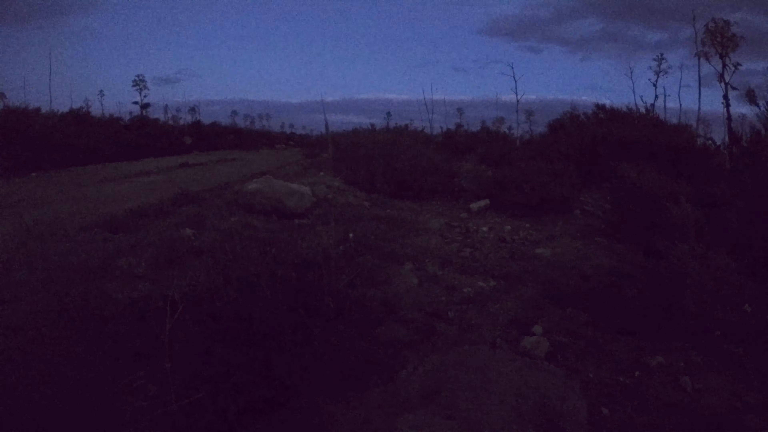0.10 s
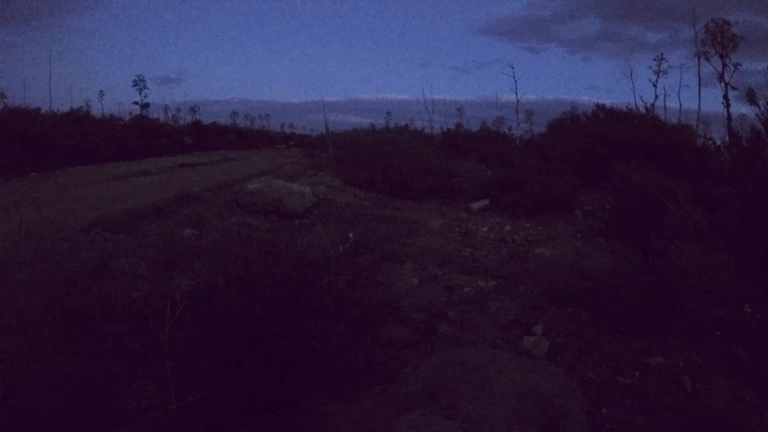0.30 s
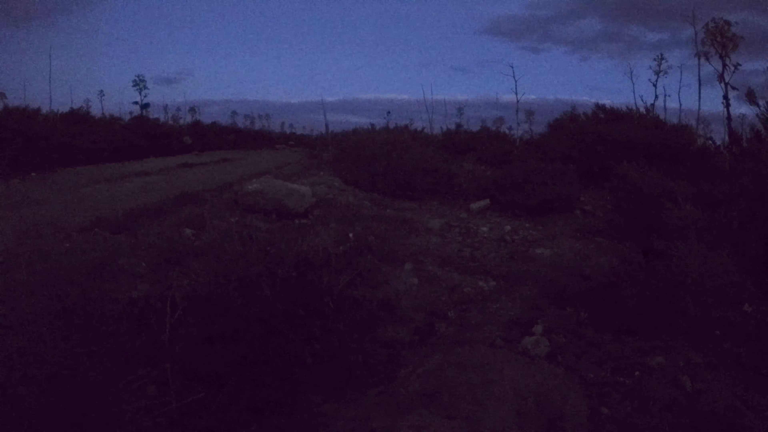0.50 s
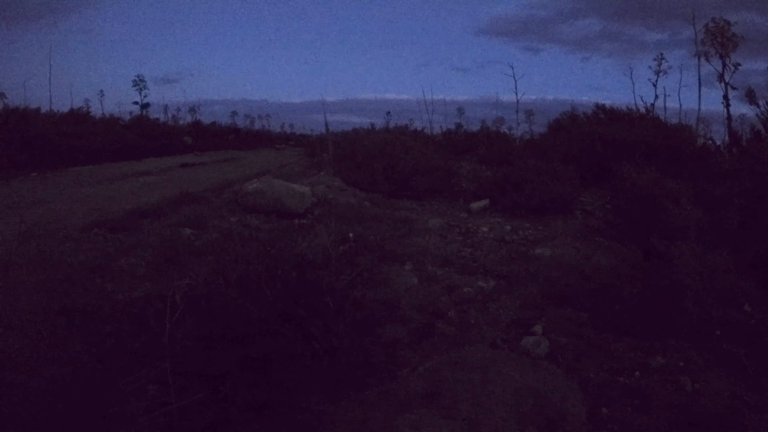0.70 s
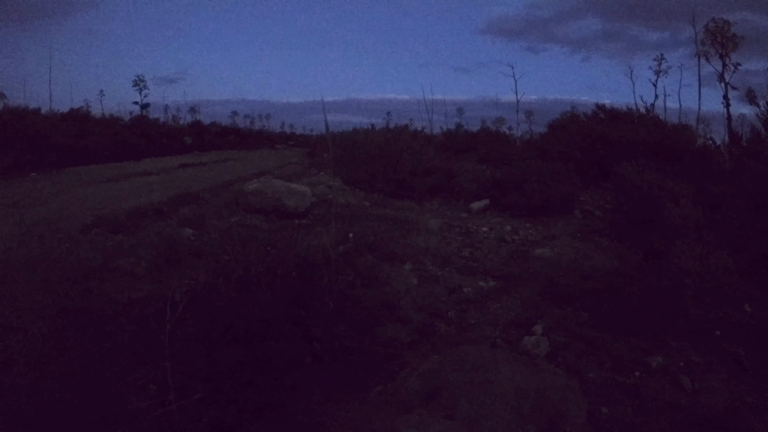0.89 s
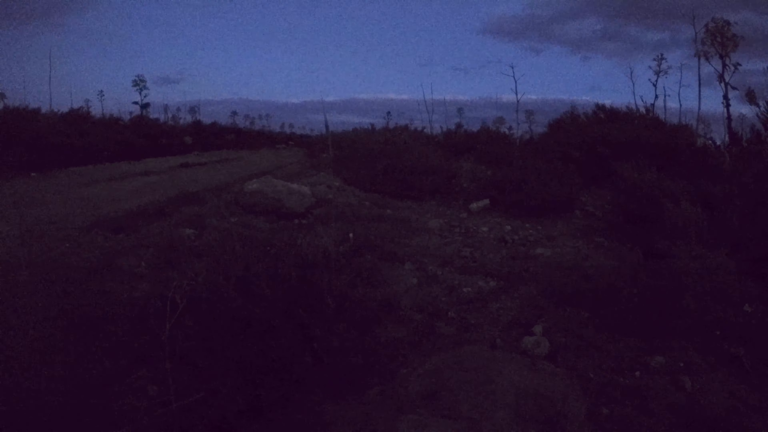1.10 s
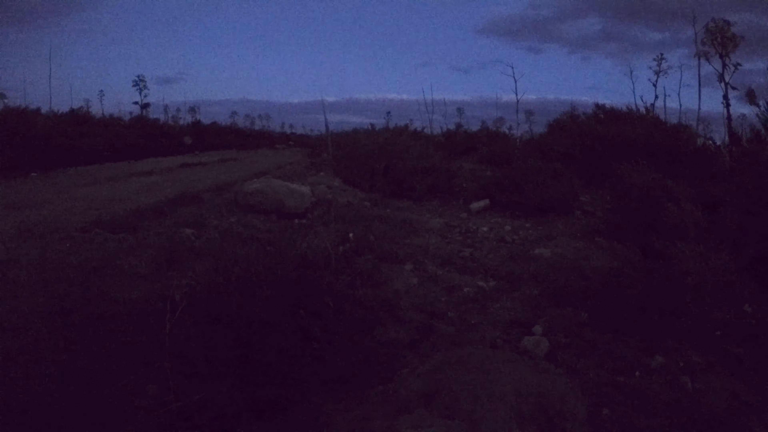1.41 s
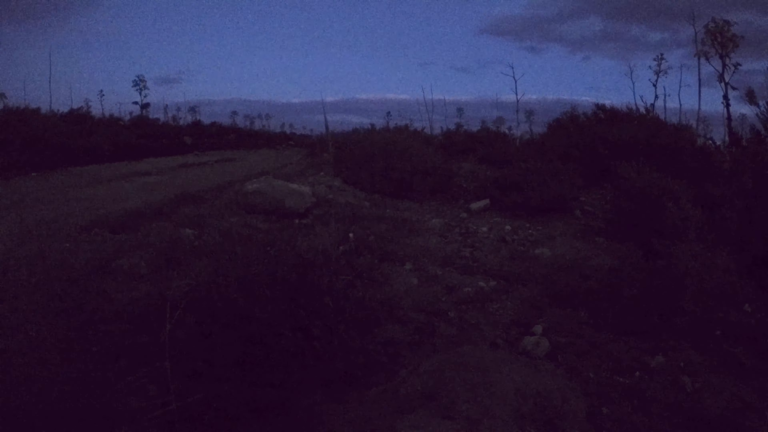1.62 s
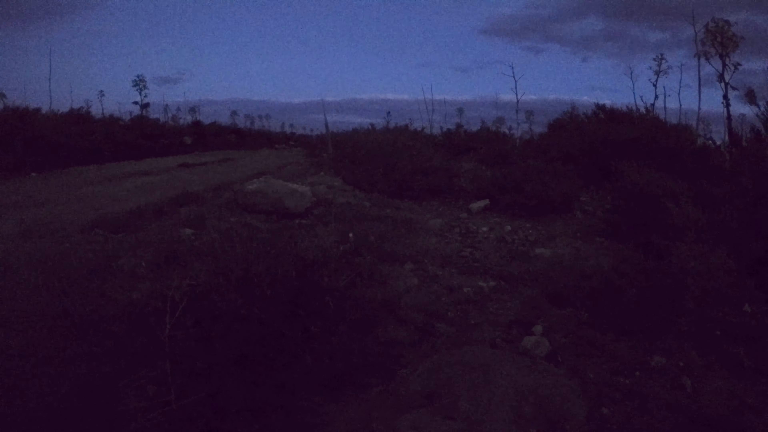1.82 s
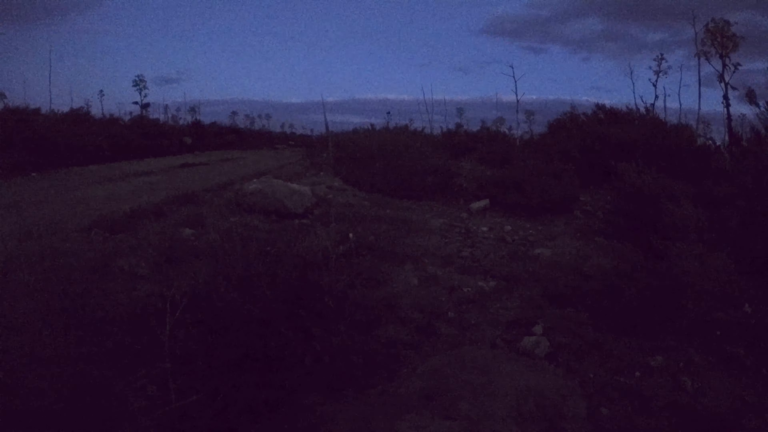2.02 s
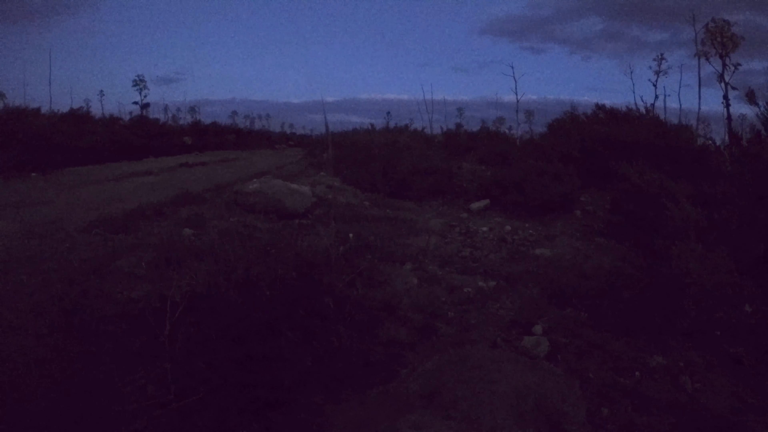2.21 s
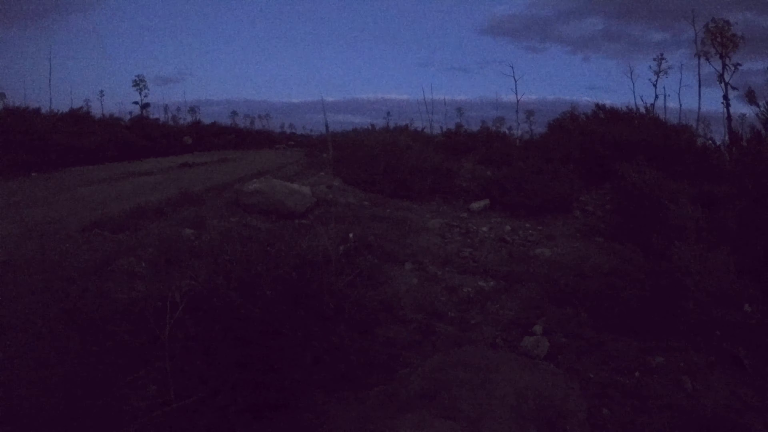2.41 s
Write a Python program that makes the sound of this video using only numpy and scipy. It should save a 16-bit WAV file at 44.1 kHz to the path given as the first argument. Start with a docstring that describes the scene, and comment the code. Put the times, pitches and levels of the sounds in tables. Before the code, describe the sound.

Handling knocks and rubbing on a camera casing, hollow plastic thuds over faint hiss outdoors

```python
"""Knocks and rubbing excite the damped modes of a handled camera's casing, which shakes its two
microphones nearly in opposition. Below, the light mount booms through three low modes and sways slowly
as narrow-band noise, over a rumble. In open scrubland at dusk a far bird chirps faintly as gliding sines
over the microphones' coloured hiss. A gain control ducks after the loudest blows."""
import sys
import numpy as np
from scipy import signal
from scipy.fft import rfft, irfft
from scipy.io import wavfile
from scipy.ndimage import uniform_filter1d

SR = 44100
rng = np.random.default_rng(int(sys.argv[2]) if len(sys.argv) > 2 else 0)


def wav_record(signal):
    """Record a signal, one row per channel, as 16-bit PCM in the file named by sys.argv[1]."""
    frames = np.transpose(np.atleast_2d(signal))
    bounded = np.clip(frames, -1, 1)
    # unit amplitude maps onto the largest positive 16-bit level
    quanta = np.round(bounded * 32767).astype(np.int16)
    wavfile.write(sys.argv[1], SR, quanta)


N = 112455

# Hiss spectrum. Each row: frequency in Hz, relative density in dB.
HISS_COLOUR = [(600, -2), (1500, 0.5), (2500, -4), (4700, -7), (7000, -5), (9500, -6), (11000, -9.5),
               (12200, -13.5), (14000, -40)]
# Stereo balance of the hiss. Each row: frequency in Hz, left minus right in dB.
HISS_PAN = [(300, -5), (2000, 2.5), (4000, -2.5), (7500, -5), (10000, -8), (13600, 3)]
HISS_TREBLE_DB, HISS_SINK_DB_PER_S = -59, 2.08  # starting level of the part above 2500 Hz; its fall

# Far chirps. Each row: start in seconds, length in seconds, first frequency in Hz, last frequency in Hz,
# level in dB before flicker and panning.
CHIRPS = [(0.584, 0.064, 3080, 3400, -69.5), (1.54, .05, 3370, 3080, -68), (1.737, 0.0393, 3360, 3100, -64)]
FLICKER_DEPTH, FLICKER_S = 0.7, 0.004  # rms share of the level; averaging time

# Rumble of air and hands. Each row: time in seconds, level in dB before panning.
RUMBLE = [(0.0, -43.5), (0.08, -42), (0.09, -42), (0.5, -39), (0.64, -45.5), (0.67, -46), (1.25, -45),
          (1.27, -41.5), (1.42, -47.5), (1.7, -44), (1.8, -45), (1.87, -39), (2.43, -48.5), (2.55, -45)]
# Rumble spectrum. Each row: frequency in Hz, relative level in dB.
RUMBLE_COLOUR = [(20, -11.5), (45, 4), (70, 3), (110, -8.5), (200, -10), (400, -20), (900, -37),
                 (3000, -73)]
RUMBLE_CORRELATION, RUMBLE_PAN_DB = 0.18, -4.5  # between left and right; left minus right

# Slow sway of the mount. Each row: time in seconds, level in dB before panning.
SWAY = [(0.0, -22), (0.11, -46.5), (0.21, -33.5), (0.37, -41.5), (0.6, -35), (0.63, -70), (0.68, -34),
        (0.73, -65), (0.81, -34), (1.43, -46.5), (1.45, -51), (1.5, -39.5), (1.71, -38), (1.76, -38),
        (2.01, -35.5), (2.11, -26.5), (2.22, -28), (2.55, -42)]
SWAY_HZ, SWAY_WIDTH_HZ, SWAY_PAN_DB = 26.59, 1.5, -3

# Knocks on the casing. Each row: start in seconds, casing level in dB before KNOCK_DB, hardness in dB per
# octave, rattle length in seconds, lift of dull modes in dB, lift of woody modes in dB, lift of top modes
# in dB, upper boom in dB before BOOM_DB, lower boom in dB before BOOM_DB.
KNOCKS = [(0.207, -27, -13, 0.003, 4, -3, -3, -42, -47),
          (0.218, -18, 5, 0.0069, 4, -5.5, -22, -29.5, -43.5),
          (0.228, -26.5, 1.5, 0.0017, -7, 12, -24, -28.5, -61),
          (0.263, -25.5, -6, 0.0021, 17, -12, -3, -59, -48),
          (0.328, -22, -15, 0.0026, 7, -22, -1, -48, -57),
          (0.376, -13, -1.5, 0.0031, 1, 0.5, -1.5, -37, -24.5),
          (0.383, -14.5, -2, 0.0077, -6, -13, -6, -24.5, -18),
          (0.409, -22, -29, 0.033, -8, 3, -7, -34.5, -49),
          (0.443, -30.5, 2, 0.036, 7.5, 13, 2, -34.5, -34.5),
          (0.488, -25.5, 7.5, 0.008, 18.5, 18, -20, -30.5, -37),
          (0.493, -27.5, 8, 0.0078, 14, 12.5, -24, -71, -28),
          (0.504, -34.5, 11, 0.0088, 13, 9.5, -22, -42, -22),
          (0.537, -32.5, 1, 0.011, 10, 11, -8, -43, -43), (0.559, -23, 8.5, 0.0084, 8, -7, -18, -31.5, -55),
          (0.563, -14.5, 4.5, 0.0047, -17, 3.5, -12, -26.5, -42),
          (0.679, -23.5, -8.5, 0.0044, -19, 2, 4, -33.5, -45),
          (0.69, -12.5, -5.5, 0.0015, -26.5, 6, -19, -49, -40),
          (0.693, -11, -18, 0.0052, -16, -10.5, -9, -36, -50),
          (0.717, -15, -9, 0.0086, 4.5, -9, 17, -18.5, -20.5),
          (0.734, -13.5, -13, 0.0029, -18.5, -6, -2, -38, -47),
          (0.798, -34.5, -4, 0.013, -7, 8.5, -7, -43.5, -37), (0.829, -28.5, -9, 0.025, 1, 2, -3, -52, -41),
          (0.854, -23.5, 0, 0.0036, -2, 8, -9, -26.5, -25),
          (0.868, -16.5, -3.5, 0.012, 8.5, 6, -8, -16.5, -23),
          (0.894, -33, -2, 0.0053, 0, 15.5, -1, -42, -36), (0.915, -33.5, 5.5, 0.024, 9, 10, -7, -50, -44),
          (0.995, -11, -1, 0.0067, 2, 3, -11.5, -21.5, -21), (1.011, -21.5, 1, 0.011, 12, 8, 4, -12.5, -34),
          (1.03, -10.5, 3, 0.0037, 10.5, -0.5, -7.5, -32, -15),
          (1.045, -10.5, -8.5, 0.0075, -6, 4, -5, -14.5, -21.5),
          (1.065, -14, -2, 0.012, -4.5, 1.5, 0, -24, -30),
          (1.08, -29.5, 7.5, 0.0057, -0.5, 14, -8, -25, -36.5),
          (1.117, -22, -15, 0.0054, 2, 10, -5.5, -49, -56),
          (1.128, -13.5, 0, 0.018, -1, -13, -12, -57, -51), (1.141, -14, 4, 0.0027, -3, 0, -9, -21, -33),
          (1.159, -14, 0, 0.0065, 6.5, 4, 4, -22.5, -33),
          (1.193, -11.5, -6.5, 0.0039, -2, 3.5, -6, -37, -42),
          (1.244, -18, -1, 0.026, 8, -6, -13, -46, -29.5),
          (1.265, -15.5, 1.5, 0.0037, -4.5, -15, 4.5, -21, -34),
          (1.271, -15.5, -6.5, 0.011, 12.5, 4.5, 7, -16, -12.5),
          (1.486, -34, -5.5, 0.004, 12.5, 7.5, -6, -35.5, -37),
          (1.541, -21, -1, 0.024, 9.5, 0, -11, -39.5, -33.5),
          (1.573, -24.5, 2.5, 0.0096, 9.5, 6.5, -2.5, -37.5, -28.5),
          (1.675, -16, -1.5, 0.011, 7.5, 2.5, -3, -22, -20),
          (1.736, -26, 2.5, 0.013, 6, -6, 0.5, -33.5, -36), (1.781, -30.5, -15, 0.018, 2, -7, 0, -39, -44),
          (1.805, -20.5, 3.5, 0.0076, 12, 4.5, -2, -28.5, -32.5),
          (1.824, -18, 1, 0.014, 11, 5, -3, -17, -19.5), (1.87, -19, -2.5, 0.0038, 1.5, -3, -6, -21, -32),
          (1.876, -10, -0.5, 0.012, 7, -12, -1, -37.5, -23),
          (1.892, -14.5, -31, 0.019, 5.5, 2, 9, -17, -18),
          (1.949, -9, -5, 0.0099, 6.5, 2, -10, -13.5, -20.5),
          (1.97, -6.5, -5.5, 0.011, 6.5, 1.5, 9.5, -7.5, -9.5),
          (2.004, -26.5, -25, 0.01, 5, -1, -5, -43, -46.5),
          (2.11, -23, 11, 0.0075, 15, 6, -12.5, -15.5, -16),
          (2.225, -36.5, -5, 0.0027, 13.5, 9, -4, -69, -88),
          (2.24, -27.5, -8.5, 0.007, -2, 2, -5.5, -54, -53),
          (2.335, -41.5, 5.5, 0.0053, -16, -5, -19, -87, -63)]
KNOCK_DB, FIRST_BLOW = 6, 0.41  # added to every knock; share of force in the first contact

# Fingers rubbing the casing. Each row: time in seconds, level in dB before RUB_DB or RUB_MOUNT_DB.
RUB = [(0.0, -58.5), (0.19, -46.5), (0.26, -41.5), (0.38, -40), (0.4, -38), (0.69, -52.5), (0.77, -43.5),
       (0.89, -36.5), (1.08, -38), (1.15, -33), (1.28, -42), (1.33, -40.5), (1.6, -44.5), (1.79, -40.5),
       (1.9, -38.5), (2.04, -45), (2.47, -50.5), (2.55, -45.5)]
RUB_GRAIN_DB, RUB_PER_S = 1.5, 4000  # spread of slip sizes; mean rate of slips
RUB_DB, RUB_MOUNT_DB = -18.5, -32  # added where rubbing drives the casing, the mount

# Mount modes. Each row: frequency in Hz, 60 dB decay time in seconds, left minus right in dB, phase lead
# of the left in radians, starting phase in radians, level over its boom column in dB.
MOUNT = [(179.53, 0.14, -6, 1.11, 0.19, 5.5), (213.2, 0.051, 11, 1.62, 0.028, 6),
         (149.8, 0.11, -16.5, 2.55, 1.28, 1.5)]
BOOM_RISE_S, BOOM_DB, MOUNT_SKIRT_HZ = 0.0038, 4, 39  # half a push; added to booms; build-up bandwidth

# Casing modes. Each row: frequency in Hz, level in dB, 60 dB decay time in seconds (ring() raises it to
# at least 0.005), left minus right in dB, phase lead of the left in radians.
CASING = [(317.2, -19.5, 0.021, -20, 0.4), (503.4, -8, 0.042, -7, 3.27), (612, -24, 0.05, -13.5, 6.6),
          (665.1, 0.4, 0.06, -7.5, 3.68), (814.7, -2.5, 0.048, -1.5, 3.46), (921, -7, 0.0088, -2, 8.28),
          (1148, -7.5, 0.051, -1.5, 3.295), (1203.5, -3.5, 0.027, 1.56, 2.725),
          (1367.4, -10, 0.019, 0.2, 8.1), (1700, -19.5, 0.012, 1.5, 2.9), (1944, -16, 0.016, -0.6, 2.22),
          (2350, -33, 0.014, -1, 2.1), (2660, -25, 0.0089, -1, 2.415), (3230, -28, 0.0041, 6.5, 1.6),
          (4110, -30.5, 0.0022, 0.5, 1.6), (5740, -41, 0.0044, -15.5, 0.55)]
# How much more rubbing drives each casing mode than a knock does. Each entry: lift in dB.
RUB_LIFT_DB = [-3, 0, 9, -9, -3.2, 1.5, 1, 4.5, 2.5, 3.5, -1, 9.5, 5.5, 5.5, 3.5, 3.5]
SOFTNESS = 0.64  # build-up bandwidth of a casing mode over its frequency
LAG_CYCLES = 1.093  # bending waves are slower the lower they are: each mode starts this many cycles late
DULL_BELOW_HZ, WOODY_HZ, TOP_ABOVE_HZ, HARDNESS_PIVOT_HZ = 620, (750, 1000), 3000, 700

KNEE_DB, SLOPE, RECOVER_DB_PER_S = -13, 0.6, 77.5  # SLOPE: dB of ducking per dB over the knee
CLIP, EDGE_HZ = 0.993, 13750  # overload ceiling; upper band edge


def gain_of(db):
    """Convert a level in decibels to an amplitude ratio."""
    return 10 ** (np.asarray(db) / 20)


def evened(x):
    """Normalise to unit root-mean-square."""
    return x / np.sqrt(np.mean(x ** 2) + 1e-20)


def panned(left_minus_right_db):
    """Split a level difference evenly into a left and a right gain."""
    return gain_of([[left_minus_right_db / 2], [-left_minus_right_db / 2]])


def read(points, hz):
    """Interpolate a spectrum along a logarithmic frequency axis."""
    f, value = np.transpose(points)
    return np.interp(np.log(hz + 1), np.log(f + 1), value)


def level(curve):
    """Interpolate an envelope in decibels and return its gain over time."""
    s, db = np.transpose(curve)
    return gain_of(np.interp(np.arange(N) / SR, s, db))


def ring(force, hz, t60, pan_db, lead, skirt_hz, order=1):
    """A damped resonance is a complex pole; broader poles at its frequency soften the build-up."""
    pole = np.exp((2j * np.pi * hz - np.log(1000) / max(t60, 0.005)) / SR)
    soft = np.exp((2j * hz - skirt_hz) * np.pi / SR)
    denominator = np.poly([pole] + order * [soft])
    # the tiny offset keeps the filter out of denormal numbers
    z = -1j * signal.lfilter([(1 - abs(soft)) ** order], denominator, force + 1e-18)
    left = (z * np.exp(1j * lead)).real
    return np.array([left, z.real]) * panned(pan_db)


def coloured(points, correlation):
    """Weighting white noise by frequency colours it; a shared part sets the stereo correlation."""
    a, b = rng.standard_normal((2, N))
    right = correlation * a + np.sqrt(1 - correlation ** 2) * b
    spectrum = rfft(np.array([a, right]))
    return irfft(spectrum * gain_of(read(points, np.fft.rfftfreq(N, 1 / SR))), N)


def hiss():
    """Microphone self-noise is random and uncorrelated left to right; here it sinks slowly."""
    hz = np.fft.rfftfreq(N, 1 / SR)
    pan_db = read(HISS_PAN, hz)
    spectrum = rfft(coloured(HISS_COLOUR, 0)) * gain_of([pan_db / 2, -pan_db / 2])
    treble = irfft(spectrum * (hz > 2500), N)
    fade = gain_of(HISS_TREBLE_DB - HISS_SINK_DB_PER_S * np.arange(N) / SR)
    return irfft(spectrum, N) / treble.std() * fade


def bird():
    """A whistle is nearly a pure tone: sines of gliding frequency, flickering in level, to the right."""
    out = np.zeros(N)
    for s, length, from_hz, to_hz, db in CHIRPS:
        u = np.linspace(0, 1, round(length * SR))
        phase = 2 * np.pi * np.cumsum(from_hz + (to_hz - from_hz) * u) / SR
        swell = np.sin(np.pi * u) ** 0.2
        out[round(s * SR):][:len(u)] += gain_of(db) * swell * np.sin(phase)
    flicker = evened(uniform_filter1d(rng.standard_normal(N), round(FLICKER_S * SR)))
    return out * (1 + FLICKER_DEPTH * flicker) * gain_of([[-6.0], [3.0]])


def rumble():
    """Air and hands give broad low-frequency noise, weakly correlated and uneven in level."""
    noise = evened(coloured(RUMBLE_COLOUR, RUMBLE_CORRELATION))
    return noise * level(RUMBLE) * panned(RUMBLE_PAN_DB)


def sway():
    """Noise through a narrow resonance is a very low wobble of wandering phase."""
    z = ring(rng.standard_normal(N), SWAY_HZ, 2.2 / SWAY_WIDTH_HZ, 0, 0, SWAY_HZ / 2)[0]
    # dividing by the envelope partly evens out the random swells
    z = z / (abs(signal.hilbert(z)) + 0.78 * z.std())
    return evened(z) * level(SWAY) * panned(SWAY_PAN_DB)


def mount():
    """A smooth push excites low modes, whose different frequencies beat against each other."""
    push = np.hanning(round(2 * BOOM_RISE_S * SR))
    push = push / push.sum()
    t = np.arange(len(push)) / SR
    shake = rng.standard_normal(N) * level(RUB) * gain_of(RUB_MOUNT_DB)
    out = np.zeros((2, N))
    boom_columns = (-2, -2, -1)  # upper, upper, lower boom of KNOCKS
    for column, (hz, t60, pan_db, lead, start, db) in zip(boom_columns, MOUNT):
        force = shake.astype(complex)
        blow = push * np.exp(1j * (2 * np.pi * hz * t + start))
        for row in KNOCKS:
            force[round(row[0] * SR):][:len(push)] += gain_of(row[column] + db + BOOM_DB) * blow
        out += ring(force, hz, t60, pan_db, lead, MOUNT_SKIRT_HZ)
    return out


def rubbing():
    """Sliding friction acts as dense, randomly timed tiny slips of uneven size."""
    size = gain_of(RUB_GRAIN_DB * np.minimum(rng.exponential(1, N), 4)) * rng.standard_normal(N)
    return evened(size * (rng.random(N) < RUB_PER_S / SR))


def rattle(length):
    """An impact is an impulse of first contact followed by a short decaying burst of noise."""
    t = np.arange(2048) / SR
    u = t / max(length / 4, 2e-4)
    tail = rng.standard_normal(2048) * np.sqrt(u) * np.exp(-u / 2.64)
    return FIRST_BLOW * (t == 0) + (1 - FIRST_BLOW) * tail / np.linalg.norm(tail)


def knock_weight_db(knock, hz):
    """The hardness of an impact sets how its force is spread over the modes."""
    _, db, hard_db, _, dull_db, woody_db, top_db, *_ = knock
    tilt_db = dull_db if hz < DULL_BELOW_HZ else hard_db * np.log2(hz / HARDNESS_PIVOT_HZ)
    woody = WOODY_HZ[0] < hz < WOODY_HZ[1]
    return db + KNOCK_DB + tilt_db + woody_db * woody + top_db * (hz > TOP_ABOVE_HZ)


def casing():
    """A struck or rubbed shell responds as a sum of its modes, neighbours driven in opposition."""
    rattles = [rattle(knock[3]) for knock in KNOCKS]
    slips = rubbing() * level(RUB) * gain_of(RUB_DB)
    out = np.zeros((2, N))
    for k, ((hz, mode_db, t60, pan_db, lead), rub_db) in enumerate(zip(CASING, RUB_LIFT_DB)):
        force = np.zeros(N + 2048)
        for knock, burst in zip(KNOCKS, rattles):
            start = round((knock[0] + LAG_CYCLES / hz) * SR)
            force[start:][:2048] += gain_of(knock_weight_db(knock, hz)) * burst
        force = gain_of(mode_db) * (force[:N] + slips * gain_of(rub_db))
        out += (-1) ** k * ring(force, hz, t60, pan_db, lead, SOFTNESS * hz, order=2)
    return out


def scene():
    """Sounds superpose linearly."""
    return hiss() + bird() + rumble() + sway() + mount() + casing()


def record(dry):
    """Compression falls fast and recovers slowly; saturation rounds peaks; a low-pass limits the band."""
    power_db = 10 * np.log10(abs(uniform_filter1d((dry ** 2).max(0), 300)) + 1e-12)
    # the running maximum against a steady fall holds each peak and releases it linearly in dB
    fall = np.arange(N) * RECOVER_DB_PER_S / SR
    held_db = np.maximum.accumulate(power_db + fall) - fall
    over_db = np.maximum(held_db - KNEE_DB, 0)
    duck_db = SLOPE * np.roll(uniform_filter1d(over_db, 200), 250)  # acts 250 samples late
    ducked = dry / gain_of(duck_db)
    ducked = ducked / (1 + (ducked / CLIP) ** 6) ** (1 / 6)
    low_pass = signal.firwin(511, EDGE_HZ, window=("kaiser", 9), fs=SR)
    return signal.oaconvolve(ducked, low_pass[None], "same")


dry = scene()
out = record(dry)
wav_record(out)
```